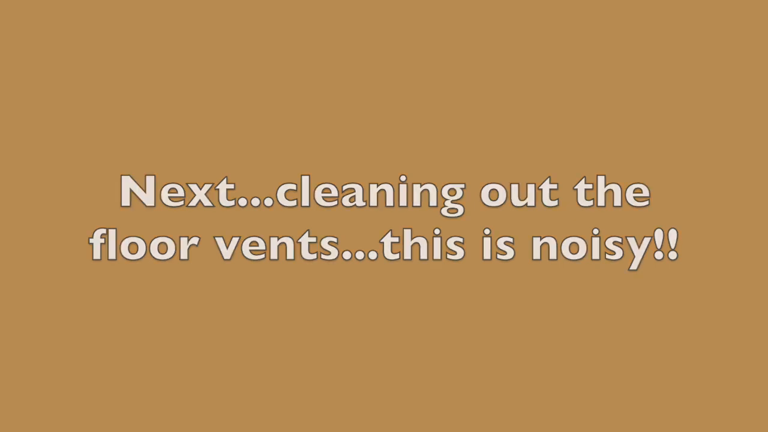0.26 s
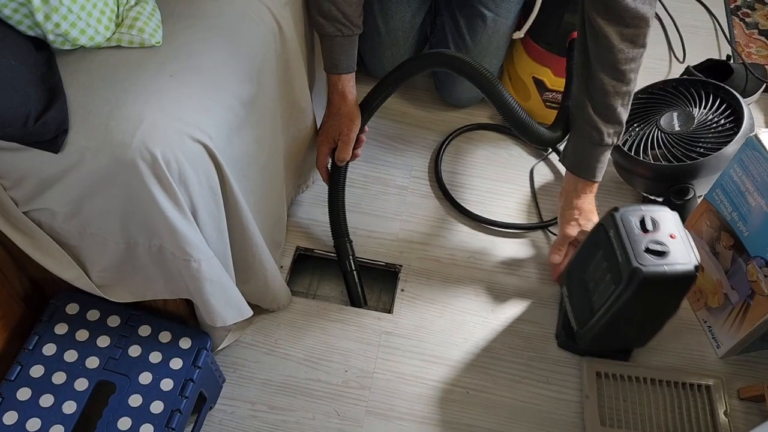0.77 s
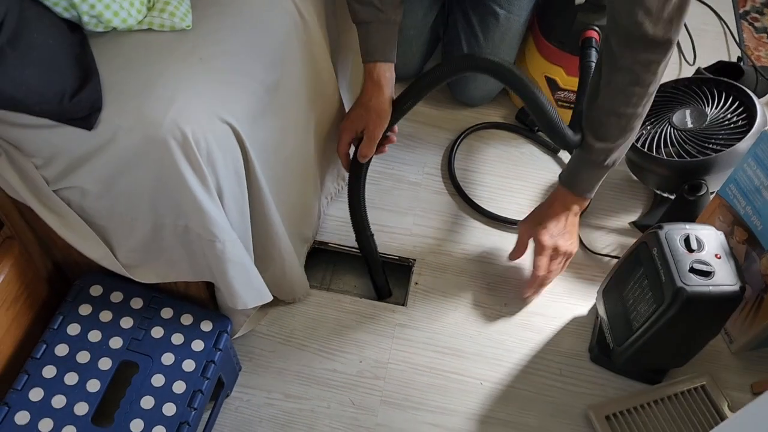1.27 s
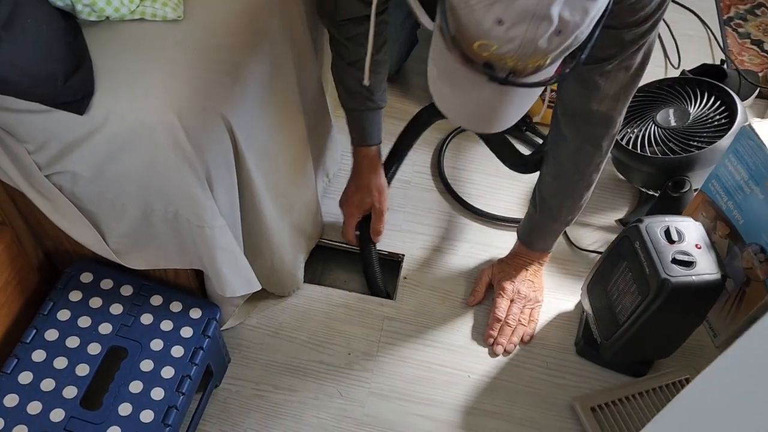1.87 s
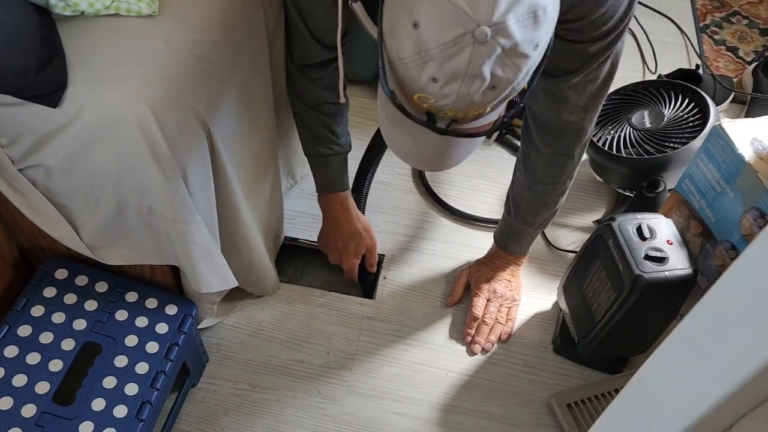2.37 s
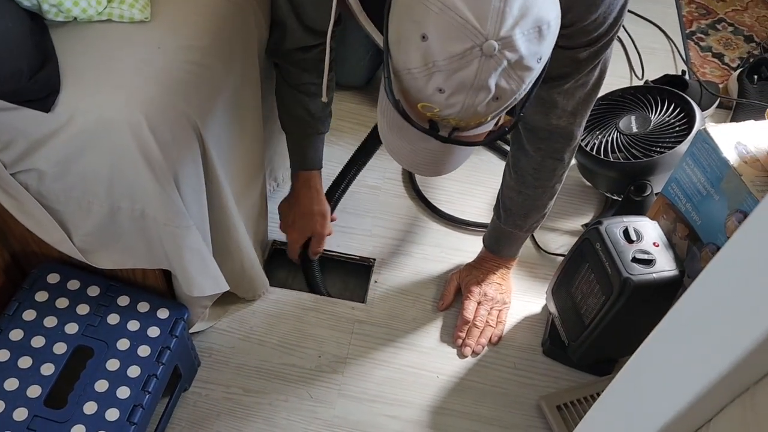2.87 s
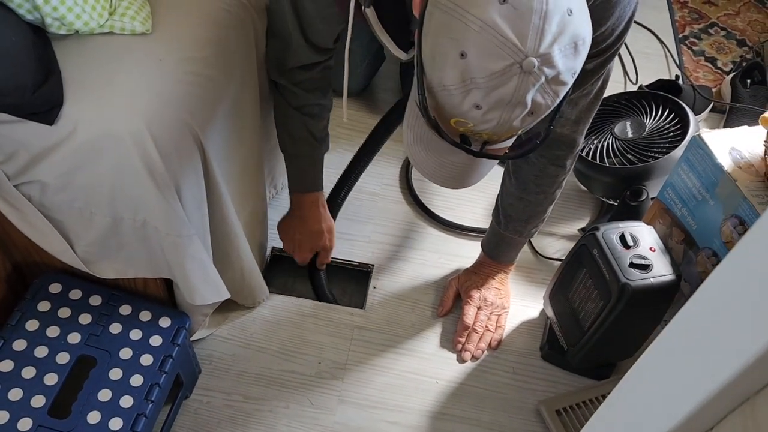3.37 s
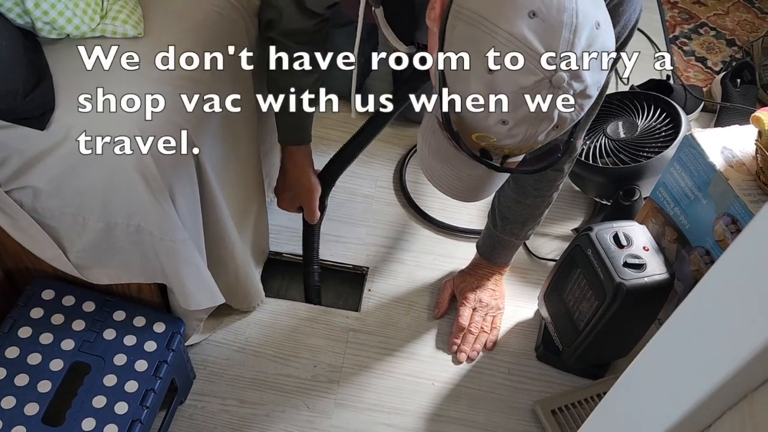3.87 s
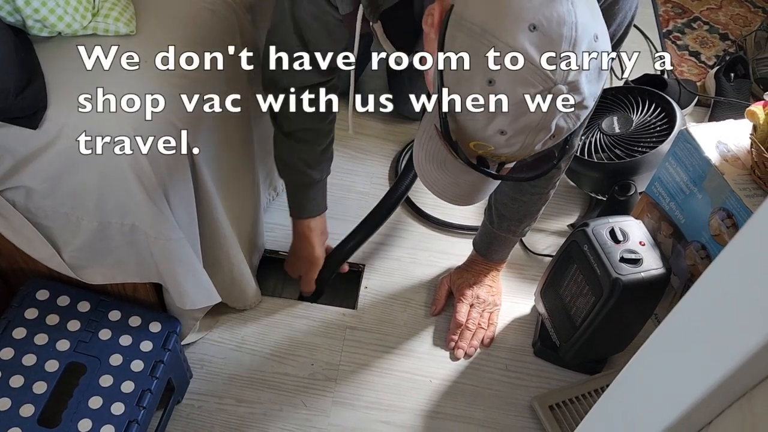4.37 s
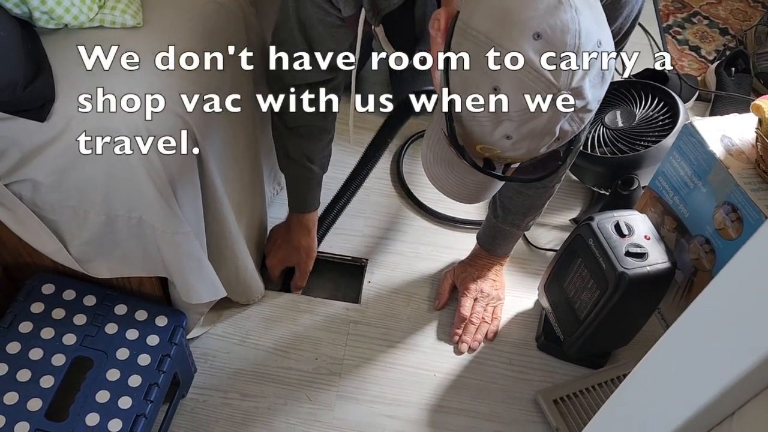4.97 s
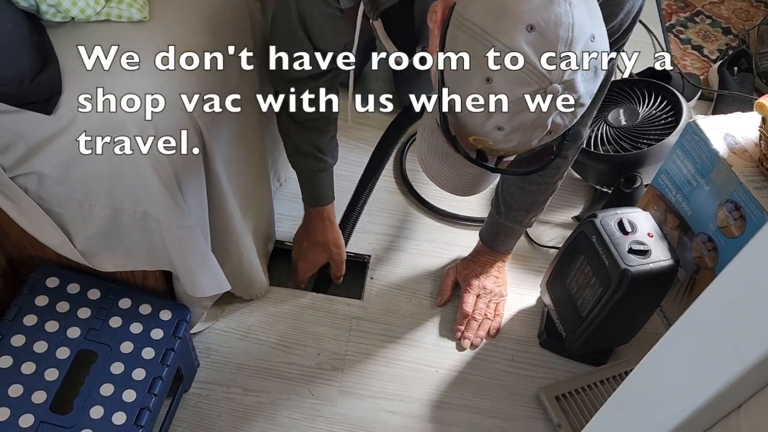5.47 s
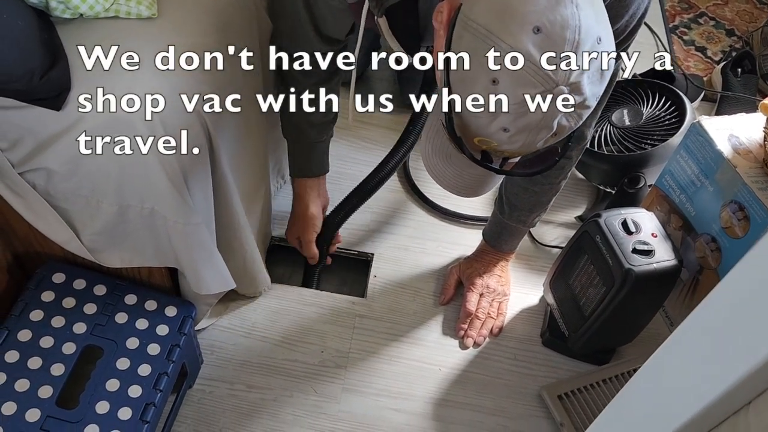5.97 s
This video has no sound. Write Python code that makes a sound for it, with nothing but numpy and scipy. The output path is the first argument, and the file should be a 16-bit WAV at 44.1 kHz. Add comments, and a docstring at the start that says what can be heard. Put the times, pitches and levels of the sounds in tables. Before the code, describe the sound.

Silence until about 0.64 s, when a loud shop vacuum cuts in without a fade, already running. Its whine and hum climb slightly in pitch, quickly until about 1.2 s, then hold nearly steady to the end at 6.2 s. A buzzy low motor hum, a strong high fan whine with overtones, a boxy drum roar, hose rush and bright hiss make a dense continuous noise. The whine wavers and shifts between left and right, strong at first and gradually receding into the airflow. Hollow tones colour the start and vanish by about 2.2 s. Dull hose thumps with bassy rumble come near 0.8 and 1.4 s, then cluster between 3.5 and 5.1 s, with another around 6.15 s. A very faint, thin whistle swells briefly near 3.6 s. Close stereo perspective in a small furnished room with short reflections; the vacuum is still running at the end.

```python
"""Shop vacuum running up to speed

A shop vacuum, just switched on, runs up to speed in a small furnished room; the sound cuts in abruptly.
The motor hums on multiples of the shaft rate, the six-bladed fan whines, and noise roars through drum and hose.
Someone leans over the vent, so the whine's paths to the two microphones keep shifting.
Hollow notes fade after the run-up, handling thumps and rumbles in the bass, and a faint whistle passes once."""
import sys
import numpy as np
from scipy import signal
from scipy.fft import rfft, irfft, next_fast_len
from scipy.io import wavfile

SR = 44100
rng = np.random.default_rng(int(sys.argv[2]) if len(sys.argv) > 2 else 0)


def wav_out(sig):
    """Save sig, one row per channel (or a flat mono array), as 16-bit PCM at SR to the path in sys.argv[1]."""
    wavfile.write(sys.argv[1], SR, np.round(np.clip(np.atleast_2d(sig).T, -1, 1) * 32767).astype(np.int16))


N = 274743
START_S = .6398   # the sound cuts in here

# shaft speed through the run-up and after: start_s [s], speed [turns/s]
SHAFT_SPEED = [(0.64, 246.12), (0.8, 250.67), (0.9, 253.08), (1.0, 254.99), (1.1, 256.49), (1.2, 257.58),
               (1.35, 258.58), (1.5, 259.24), (1.7, 259.77), (2.3, 260.8), (3.1, 260.9), (4.3, 261.57),
               (4.9, 261.25), (5.3, 260.62), (5.7, 260.4), (6.23, 260.8)]


def from_db(db):
    """Decibels to an amplitude factor."""
    return 10 ** (np.asarray(db) / 20)


def rms_one(x):
    """Scale a signal to rms 1."""
    return x / np.sqrt(np.mean(x ** 2) + 1e-20)


def in_time(rows):
    """Glide every column of a table along its first column of seconds."""
    s, *columns = np.transpose(rows)
    return [np.interp(np.arange(N) / SR, s, c) for c in columns]


def at_hz(points, hz):
    """Read a spectrum curve on a logarithmic frequency axis."""
    point_hz, values = np.array(points).T
    return np.interp(np.log(hz + 1), np.log(point_hz + 1), values)


def drift(rate_hz):
    """Slow chance: noise at every 40th sample through a double one-pole low-pass; spread about 1."""
    pole = np.exp(-80 * np.pi * rate_hz / SR)
    noise = rng.standard_normal(N // 40 + 2002)
    slow = signal.lfilter([1], [1, -2 * pole, pole * pole], noise)[2000:]   # drop the settling
    return np.interp(np.arange(N) / 40, np.arange(len(slow)), rms_one(slow))


def tone(turns, order, left_db, right_db, lead, waver_db):
    """One shaft order as a sine in each channel, its level wavering with the air load."""
    phase = 2 * np.pi * (order * turns + rng.random())
    gain = np.sqrt(2) * from_db(waver_db * drift(20.4))   # root 2: levels are rms
    left = from_db(left_db) * np.sin(phase + lead)
    right = from_db(right_db) * np.sin(phase)
    return gain * np.array([left, right])


def faded(order):
    """Bell-shaped fades and swells as paths shift: added left dB, right dB and left lead of one order."""
    # peak_s [s], half_length_s [s], shaft_order, added left_db [dB], right_db [dB], left_lead [rad]
    fades = [(.64, .06, 4, -10, -8, 0), (.64, .05, 12, -15, -7, 0.5), (.66, 0.18, 24, -14, -3, -2),
             (.74, .04, 12, -0.5, 2, -.9), (.75, .15, 18, -16, -9, -1), (0.884, .09, 12, -17, -4, .7),
             (1.0, .05, 18, 1, 4, -0.8), (1.08, 0.13, 12, -2.5, -4, -0.5), (1.18, 0.066, 18, -11, 6, -2),
             (1.31, 0.13, 18, -6, -10, 3), (1.302, 0.17, 24, 5, 5.5, 0), (1.348, 0.054, 12, -1, -8, -2),
             (1.4, 0.22, 30, 7, 6, 0.5), (1.623, 0.092, 12, 0, 1, 0.8), (1.65, 0.41, 24, 2, 9, 0),
             (1.7, .45, 2, 2.5, 1.5, 0), (1.75, 0.6, 4, -6, -2.5, 0), (1.9, 0.22, 12, 0, -10, 0.1),
             (2.45, 0.38, 18, -21, 3, 0.5), (2.704, 0.26, 2, 2.5, 1.5, 3), (3.06, 0.35, 18, -11, 2.5, -2),
             (3.613, .35, 12, -5, -2.5, 0.5), (3.648, 0.34, 2, -1, -2.5, 0), (3.65, 0.52, 18, 2, 2, -1.56),
             (4.2, .6, 30, 15.5, 4, 1.5), (4.3, 0.33, 18, -2.5, 1.5, -1.2), (4.35, .3, 24, -4, 5, 0),
             (4.45, 0.25, 12, -0.5, -6, 1.1), (4.694, 0.46, 2, -2, -2, 0), (4.8, .25, 18, 1.5, -7, -1.4),
             (5.057, 0.38, 12, -8.5, -8.5, -.5), (5.1, 0.17, 24, -3, -17, 0), (5.25, 0.15, 18, -1, -4, 0),
             (5.8, 0.65, 24, 6.5, 1, -4.5), (5.8, .5, 30, 15, 5, 0.5), (5.9, 0.58, 18, -0.5, 1.5, -0.5),
             (5.98, 0.087, 2, 0.5, 0.5, 7.5), (6.2, .45, 12, -2, -15, -1.5), (6.2, .3, 24, -1, 4, -0.5)]
    t = np.arange(0, N + 64, 64) / SR   # every 64th sample is enough
    out = np.zeros((3, len(t)))
    for s, half_s, which, *change in fades:
        if which == order:
            out = out + np.exp(-((t - s) / half_s) ** 2) * np.c_[change]
    return np.array([np.interp(np.arange(N) / SR, t, row) for row in out])


def noise_in_room(spectrum, resonances=(), count=9):
    """Several noise outlets, each heard directly and through its own decaying echoes; rms 1."""
    # likeness of left and right: pitch_hz [Hz], correlation
    likeness = [(60, 0.97), (130, 1), (290, 0.87), (640, 0.85), (1410, 0.28), (3100, 0.089), (6820, 0.031),
                (15000, 0.035)]
    # level of left over right: pitch_hz [Hz], level_db [dB]
    left_over_right = [(60, -0.0), (200, 1.9), (350, -0.6), (650, -2.6), (900, -1.0), (1200, -0.4),
                       (1800, -1.5), (2400, -0.0), (2850, 1.0), (3900, 0.9), (5200, -2.7), (6800, 1.3),
                       (12000, 0.7), (15000, 1.9)]
    room_t60_s, echo_db, left_lag_s = 0.19, -1.5, 9e-5   # echo energy is relative to the direct sound

    size = next_fast_len(N)
    hz = np.arange(size // 2 + 1) * SR / size
    level_db = at_hz(spectrum, hz)
    for centre_hz, width_hz, top_db in resonances:
        level_db = level_db + top_db / (1 + (2 * (hz - centre_hz) / width_hz) ** 2)
    alike = np.clip(at_hz(likeness, hz), -.99, .99)
    lean = from_db(at_hz(left_over_right, hz) * [[.5], [-.5]])
    lag = np.exp(-2j * np.pi * hz * left_lag_s * np.array([[1], [0]]))
    fade = from_db(-60 * np.arange(SR // 2) / SR / room_t60_s)

    out = 0
    for _ in range(count):
        paths = rng.standard_normal((2, SR // 2)) * fade / np.sqrt(np.sum(fade ** 2))
        paths[0, 0] = from_db(-echo_db)   # the direct sound, in the shared path
        paths[0] /= np.sqrt(1 + from_db(-2 * echo_db))
        shared, split = rfft(paths, size)   # what both microphones share, and what differs
        ears = np.sqrt(1 + alike) * shared + np.sqrt(1 - alike) * split * [[1], [-1]]
        out = out + ears * rfft(rng.standard_normal(size))
    return rms_one(irfft(out * lean * lag * from_db(level_db), size)[:, :N])


def motor(turns):
    """Unbalance and poles hum at low shaft orders, growing with speed; weaker orders come and go."""
    # hum before fades: shaft_order, slowest_db [dB rms], fastest_db [dB rms], left_lag [rad]
    hum = [(1, -64, -43, .62), (2, -39.5, -31.5, .32), (4, -37, -36.5, 0.42)]
    # middle levels of the weaker orders: shaft_order, left_db [dB rms], right_db [dB rms], left_lead [rad]
    weak_orders = [(3, -39, -43, 0), (5, -60, -46.5, -2.5), (8, -47.5, -41, -1.5), (9, -48.5, -42, -1.3),
                   (10, -60, -48, -2.5), (13, -50, -69, -0.5), (14, -49, -51, -3), (16, -52, -49, 1),
                   (19, -56, -45, 4), (20, -64, -54, 2.5), (21, -57, -48.5, -0.5), (22, -57, -48, 5.5),
                   (28, -50.5, -56, -1), (34, -63, -59, -4), (36, -49, -47.5, -2)]
    speed, = in_time(SHAFT_SPEED)
    run_up = (speed - speed.min()) / np.ptp(speed)   # 0 at the slowest, 1 at the fastest
    out = 0
    for order, slowest_db, fastest_db, lag in hum:
        db = slowest_db + (fastest_db - slowest_db) * run_up
        left_db, right_db, _ = db + faded(order)   # low tones keep their phase
        out = out + tone(turns, order, left_db, right_db, -lag, waver_db=0.6)
    for order, left_db, right_db, lead in weak_orders:
        slow_gain = from_db(1.3 * drift(2.1))
        out = out + slow_gain * tone(turns, order, left_db, right_db, lead, waver_db=3)
    return out


def fan(turns):
    """Blades passing the outlet whine at the blade rate and its overtones."""
    # whine at the blade rate: start_s [s], left_db [dB rms], right_db [dB rms], left_lead [rad]
    whine = [(0.68, -21.5, -24, -3), (0.82, -25, -15.5, -5), (0.88, -37, -18.5, -2), (0.95, -25, -16, -1.7),
             (1.06, -27, -32, -1.5), (1.12, -25.5, -27, -4.5), (1.22, -31, -20.5, -5.5),
             (1.4, -25, -22, -5.5), (1.66, -30, -20, -6), (1.9, -28, -19, -7.5), (2.29, -31.5, -28, -6),
             (2.92, -31, -28, -5.5), (3.34, -35.5, -28.5, -8), (3.7, -26, -28, -9.5), (4.18, -28, -40, -9),
             (4.81, -30.5, -36, -10), (5.44, -36, -43, -8.5), (6.23, -35, -42, -9)]
    # overtones before fades: multiple of the blade rate, left_db [dB rms], right_db [dB rms],
    # first_left_lead [rad], last_left_lead [rad], settle_s [s, time constant]
    overtones = [(2, -27, -32.5, -1.5, 6, 1), (3, -35, -36.5, -2.5, -7, 1.33),
                 (4, -44.5, -45.5, -5, -3.5, 3.7), (5, -52, -50.5, -3.5, 0.5, 1.8)]
    blades = 6
    out = tone(turns, blades, *in_time(whine), waver_db=0.32)
    running_s = np.maximum(np.arange(N) / SR - START_S, 0)
    for multiple, left_db, right_db, first, last, settle_s in overtones:
        order = blades * multiple
        lead = last + (first - last) * np.exp(-running_s / settle_s)
        more_left_db, more_right_db, more_lead = faded(order)
        out = out + tone(turns, order, left_db + more_left_db, right_db + more_right_db,
                         lead + more_lead, waver_db=0.51 * multiple)
    return out


def air():
    """Turbulent flow: a resonant drum roar, a hose rush and a bright hiss, all fluttering a little."""
    # levels before flutter: start_s [s], roar_db [dB rms], rush_db [dB rms], hiss_db [dB rms]
    air_levels = [(0.64, -30, -30, -29.5), (0.81, -27.5, -28, -29), (1.0, -28, -27.5, -28),
                  (3.67, -28, -28.5, -28), (4.5, -28.5, -27, -28), (6.23, -29, -26.5, -28)]
    # roar in the drum: pitch_hz [Hz], relative level_db [dB per Hz]
    roar_colour = [(40, -20), (100, -11), (160, -4), (220, -6.5), (300, -7.5), (450, -7.5), (700, -2),
                   (1000, 0.5), (1250, -5.5), (1600, -23)]
    # resonances of drum and room in the roar: pitch_hz [Hz], width_hz [Hz], added level_db [dB]
    booms = [(203, 46, 3.5), (360, 63, 8), (544, 42, 9.5), (630, 23, 2), (689, 25, 9.5), (752, 18, 5.5),
             (788, 17, 9), (862, 16, 8.5), (931, 27, 7), (1012, 31, 7.5), (1160, 87, 8.5), (440, 36, -4),
             (591, 18, -7.5), (845, 15, 0.5)]
    # air tearing through the ribbed hose: pitch_hz [Hz], relative level_db [dB per Hz]
    rush_colour = [(800, -23), (1150, -4), (1400, 1), (1700, -4), (2200, 0), (2450, -1), (2800, -9),
                   (3500, -8.5), (4500, -25.5)]
    # jet at nozzle and exhaust: pitch_hz [Hz], relative level_db [dB per Hz]
    hiss_colour = [(1800, -38.5), (2800, -5), (3400, -6), (4200, -7.5), (5200, -7), (6100, -8.5),
                   (6900, -16), (7500, -12), (8800, -14), (9900, -21.5), (10800, -20.5), (12000, -16.5),
                   (14000, -21.5), (16000, -18)]
    roar_db, rush_db, hiss_db = in_time(air_levels)
    roar = from_db(roar_db + 0.26 * drift(11)) * noise_in_room(roar_colour, booms)
    rush = from_db(rush_db + 0.66 * drift(6.0)) * noise_in_room(rush_colour, count=5)
    hiss = from_db(hiss_db + 0.65 * drift(7.1)) * noise_in_room(hiss_colour, count=5)
    return roar + rush + hiss


def hollow():
    """Air noise caught in a few narrow resonances, fading after the run-up."""
    # start_s [s], level_db [dB rms]
    hollow_level = [(.64, -40), (.95, -36), (1.3, -40), (1.7, -38), (2.2, -62), (6.23, -67)]
    # resonances: pitch_hz [Hz], width_hz [Hz], added level_db [dB]
    hollow_notes = [(354, 60, 17.6), (722, 30, 25), (936, 35, 33)]
    # noise under the resonances: pitch_hz [Hz], relative level_db [dB per Hz]
    hollow_colour = [(150, -20), (300, 0), (1100, 0), (1500, -20), (16000, -60)]
    level_db, = in_time(hollow_level)
    return from_db(level_db) * noise_in_room(hollow_colour, hollow_notes, count=3)


def rumble():
    """Lumpy low noise, much alike in both channels; each shove rises fast and dies more slowly."""
    # the hose is shoved about and the floor rumbles:
    # peak_s [s], rise_s [s], level_db [dB, added to the floor as amplitude]
    shoves = [(.82, 0.073, -38), (1.38, .04, -42), (1.6, .12, -53), (1.93, .07, -44), (3.08, .03, -49),
              (3.52, 0.07, -38), (3.72, .07, -39), (3.82, .04, -42), (4.08, 0.037, -37), (4.39, 0.078, -37),
              (4.68, 0.026, -39), (4.98, .06, -50), (5.8, .04, -46), (6.16, .04, -38)]
    # pitch_hz [Hz], relative level_db [dB per Hz]
    rumble_colour = [(15, -23), (30, -1), (45, 1.5), (80, 6), (130, 2), (250, -16)]
    floor_db, fall_over_rise = -54.5, 2.2
    t = np.arange(N) / SR
    level = from_db(floor_db)
    for s, rise_s, db in shoves:
        side_s = np.where(t < s, rise_s, rise_s * fall_over_rise)
        level = level + from_db(db) * np.exp(-((t - s) / side_s) ** 2)
    lumps = from_db(1.2 * drift(24))
    return level * lumps * noise_in_room(rumble_colour, count=3)


def knocks():
    """Each knock is a dull low ring with a few-millisecond rise, carried alike to both microphones."""
    # knocks of hose and handling: start_s [s], peak_db [dB], pitch_hz [Hz, lower mode], t60_s [s]
    knock_list = [(.822, -29, 81, .12), (1.371, -24, 85, .06), (2.581, -39, 300, .05),
                  (3.467, -32, 69, 0.065), (3.694, -32, 55.3, .12), (3.80, -28, 70, .08),
                  (3.827, -31, 109, 0.054), (4.061, -24, 85.6, 0.056), (4.071, -25, 174, .07),
                  (4.14, -31, 150, .06), (4.369, -31, 60, 0.11), (4.449, -31, 146, 0.052),
                  (4.645, -23, 190, 0.064), (4.97, -31, 100, 0.073), (5.076, -33, 150, 0.055),
                  (6.15, -28, 85.5, 0.1), (6.215, -32, 90, .06)]
    out = np.zeros(N)
    t = np.arange(SR // 4) / SR
    for s, peak_db, hz, t60_s in knock_list:
        at = round(s * SR)
        # two modes of the struck panel
        body = np.sin(2 * np.pi * hz * t) + .4 * np.sin(2 * np.pi * 2.3 * hz * t)
        shape = from_db(-60 * t / t60_s) * (1 - np.exp(-t / .005)) * body
        ring = from_db(peak_db) * shape / np.max(np.abs(shape))
        out[at:at + len(t)] += ring[:N - at]
    return out


def whistles():
    """Air noise through one narrow resonance, swelling and gone as the nozzle half closes."""
    # peak_s [s], half_length_s [s], pitch_hz [Hz], level_db [dB rms at the peak]
    whistle_list = [(3.585, .05, 4285, -42)]
    width_hz = 12
    t = np.arange(N) / SR
    pole = np.exp(-np.pi * width_hz / SR)
    out = 0
    for s, half_s, hz, db in whistle_list:
        resonance = [1, -2 * pole * np.cos(2 * np.pi * hz / SR), pole * pole]
        air_tone = signal.lfilter([1, 0, -1], resonance, rng.standard_normal(N))
        swell = np.exp(-((t - s) / half_s) ** 2)
        out = out + from_db(db) * swell * rms_one(air_tone)
    return out


def scene():
    """Sum all layers, with motor and fan locked to one turning shaft."""
    turns = np.cumsum(in_time(SHAFT_SPEED)[0]) / SR
    return motor(turns) + fan(turns) + air() + hollow() + rumble() + knocks() + whistles()


def record(dry):
    """Silence until the sound cuts in; a steep low-pass removes the top."""
    cut_in = np.arange(N) >= START_S * SR
    cutoff_hz = 15750
    low_pass = signal.ellip(16, .5, 95, cutoff_hz, fs=SR, output="sos")
    return signal.sosfilt(low_pass, dry * cut_in)


dry = scene()
out = record(dry)
wav_out(out)
```